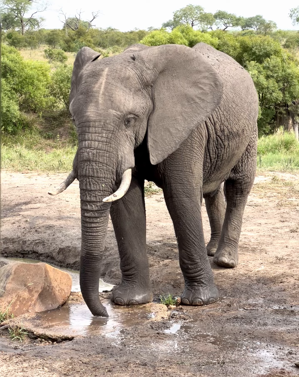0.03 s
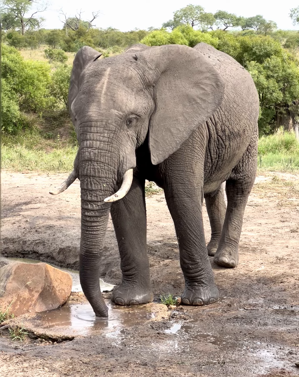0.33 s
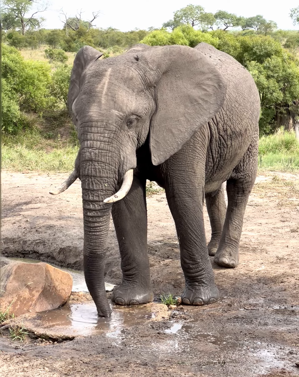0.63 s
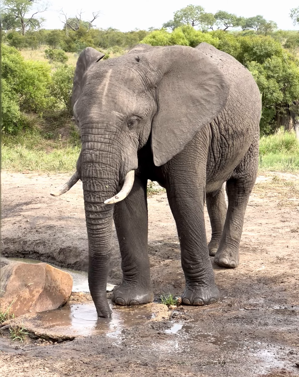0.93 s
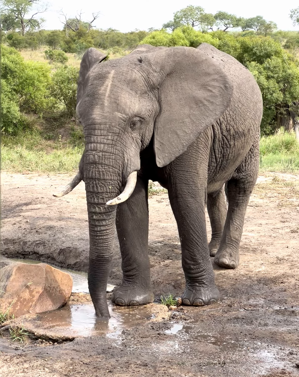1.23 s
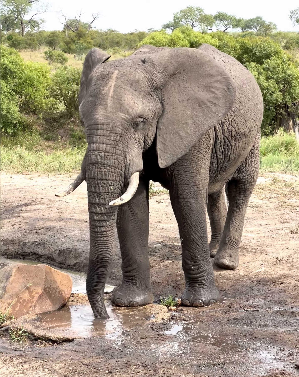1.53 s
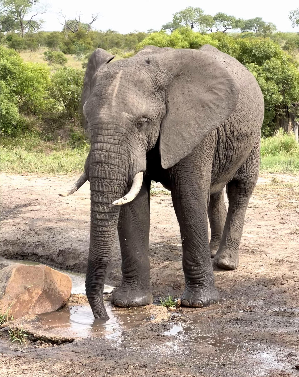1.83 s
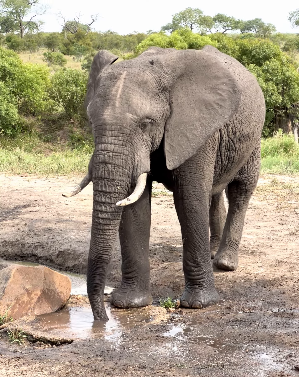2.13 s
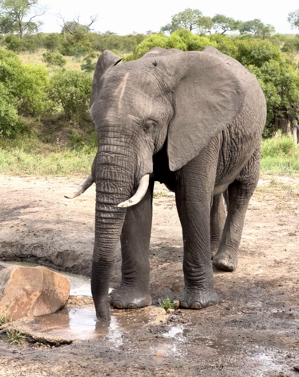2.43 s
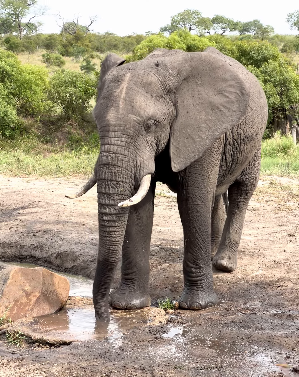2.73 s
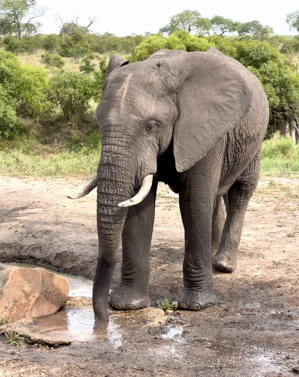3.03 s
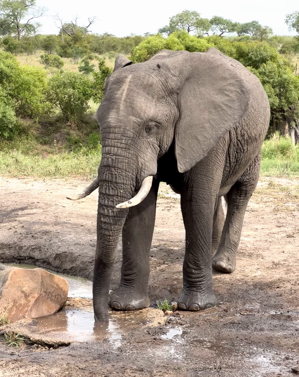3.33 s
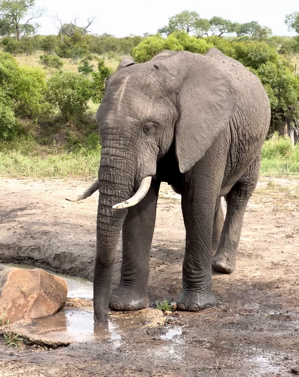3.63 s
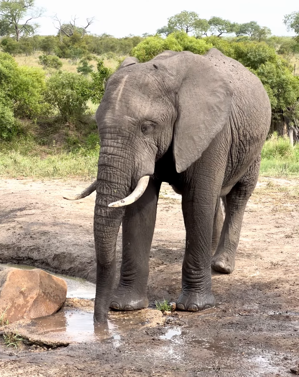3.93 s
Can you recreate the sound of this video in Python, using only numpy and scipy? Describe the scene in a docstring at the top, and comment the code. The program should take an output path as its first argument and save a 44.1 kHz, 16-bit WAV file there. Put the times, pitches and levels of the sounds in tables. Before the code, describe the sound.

An elephant blows air and water out of its trunk, sputtering with small bubbly pops from about 0.6 to 1.3 seconds. Wind bumps the microphone throughout, with heavy low thuds near 1.7 seconds. A short spitting puff comes at 2.4 seconds, then a long hissing blow runs from 2.7 seconds until the end at 4. Insects, distant birds and rustling bushes stay very faint behind.

```python
"""An elephant blows air and water out of its trunk at a muddy waterhole: a short wet blow,
a few spits and a puff, then a long hiss. The rushing air is noise, coloured by the trunk's
resonances (the pitches it rings at); the spits are bursting bubbles. Wind hits the
microphone in low thuds, while insects and far birds sound faintly in the rustling bush."""
import sys
import numpy as np
from scipy import signal
from scipy.fft import rfft, irfft
from scipy.io import wavfile
from scipy.ndimage import uniform_filter1d, map_coordinates

SR = 44100
rng = np.random.default_rng(int(sys.argv[2]) if len(sys.argv) > 2 else 0)


def pcm_store(signal):
    """Save signal as 16-bit PCM."""
    levels = np.round(np.clip(np.atleast_2d(signal), -1, 1) * 32767)
    wavfile.write(sys.argv[1], SR, levels.astype(np.int16).T)


N = 176400
T, HZ = np.arange(N) / SR, np.fft.rfftfreq(N, 1 / SR)

# tone colour of each background noise (frequency [Hz], relative level [dB])
BUSH_COLOUR = [(100, 6), (500, -1), (800, 0), (1050, 0.5), (1500, 0), (2100, -6.5), (3000, -4),
               (4000, -8.5), (5300, -15), (7000, -10.5), (9000, -8), (10000, -19.5), (11000, -22),
               (12000, -15), (15000, -23)]
BREEZE_COLOUR = [(20, -50), (35, -11), (55, 6), (90, 5.5), (150, -7), (250, -13.5), (450, -31.5),
                 (900, -63)]
# bands of insect song (pitch [Hz], rough width [Hz], level [dB])
INSECT_BANDS = [(7230, 600, -84.5), (7820, 260, -83.5), (8220, 260, -80)]
# how the song swells (time [s], level change [dB])
INSECT_LOUDNESS = [(0, -2.5), (.4, 0), (1.45, -3), (1.85, 0.5), (2.4, -2.5)]
# far bird notes (middle [s], half length [s], pitch [Hz], level [dB])
FAR_NOTES = [(0.007, 0.063, 1365, -67.5), (0.333, 0.038, 1040, -71.5), (1.59, 0.032, 1030, -67),
             (2.054, 0.017, 3700, -80), (2.158, 0.01, 3940, -75), (1.721, 0.023, 4000, -74.5),
             (1.834, 0.011, 3600, -76.5), (2.277, 0.023, 4340, -71)]
# the breeze arriving at the microphone (time [s], level [dB])
BREEZE_LOUDNESS = [(0, -55), (.3, -67), (.55, -55), (.85, -47.5), (1.1, -44.5), (1.5, -56), (1.65, -53),
                   (1.9, -44.5), (2.22, -48), (2.4, -43.5), (2.57, -47), (2.68, -65), (2.78, -50),
                   (3.02, -60.5), (3.42, -40), (3.65, -57), (4, -64)]
# gusts arriving there (middle [s], length [s], level [dB], upper edge [Hz])
GUSTS = [(0.073, 0.026, -50, 76), (0.187, 0.033, -49, 98), (0.478, 0.02, -47.5, 139),
         (0.589, 0.018, -28, 179), (0.742, 0.027, -32, 160), (1.017, 0.013, -32, 187),
         (1.061, 0.015, -37.5, 157), (1.097, 0.013, -33, 183), (1.139, 0.032, -37.5, 201),
         (1.286, 0.026, -31.5, 145), (1.404, 0.0081, -39.5, 183), (1.566, 0.015, -44.5, 86.4),
         (1.715, 0.02, -29, 273), (1.746, 0.025, -31.5, 101), (1.7795, 0.0022, -28.5, 714),
         (1.824, 0.03, -39, 95), (1.876, 0.045, -42, 170), (2.055, 0.022, -30, 172),
         (2.093, 0.012, -31.5, 188), (2.151, 0.031, -38.5, 207), (2.289, 0.022, -31, 171),
         (2.341, 0.022, -35, 101), (2.531, 0.021, -34.5, 225), (2.929, 0.0083, -38.5, 179),
         (2.96, 0.023, -42, 110), (3.111, 0.059, -41, 177), (3.21, 0.041, -42.5, 206),
         (3.326, 0.038, -36.5, 147), (3.412, 0.016, -30, 225), (3.487, 0.016, -37, 148)]
# how the microphone colours both (frequency [Hz], level change [dB])
MIC_COLOUR = [(30, -4.5), (60, 1.5), (85, 2), (115, 2), (160, -2), (235, -1.5), (340, -2), (470, 3),
              (650, -3.5), (1200, -12)]
# heavy thuds (start [s], swell time [s], first pitch [Hz], last pitch [Hz], level [dB])
WIND_THUDS = [(1.699, 0.0048, 298, 199, -18), (1.7092, 0.011, 536, 102, -18), (1.7765, 0.013, 943, 79, -17)]
# fine high sprays (middle [s], half length [s], level [dB])
MIST_BURSTS = [(0.999, 0.012, -49.5), (1.158, .005, -51.5), (1.656, 0.034, -74)]
# bubbles at the trunk tip (time [s], pitch [Hz], pop level [dB], spray level [dB])
BUBBLES = [(0.6385, 1240, -31, -41.5), (0.7234, 1240, -32.5, -45), (0.762, 1280, -29, -37),
           (.765, 2050, -35, -40), (0.8095, 2990, -41, -37.5), (0.826, 1910, -33, -39.5),
           (0.866, 1247, -33, -39), (0.9, 1350, -39, -50), (0.9214, 1094, -37, -59),
           (0.964, 1550, -52, -45), (1.15, 2000, -50, -45), (1.212, 2210, -50, -49),
           (1.3687, 1620, -55, -55.5), (2.316, 1055, -47, -52.5), (2.323, 2290, -54, -54),
           (2.329, 1575, -46, -51), (2.344, 4660, -66, -51.5), (2.3744, 2600, -55, -50.5),
           (2.381, 1580, -42, -45.5), (2.401, 530, -36, -50.5), (2.437, 1580, -47, -47),
           (2.445, 1130, -35.5, -40), (2.501, 5400, -47, -54), (2.533, 1250, -57, -45),
           (2.619, 3960, -43, -52)]
# tone colour of each spray and air jet (frequency [Hz], relative level [dB])
MIST_COLOUR = [(1000, -15), (6000, 1), (10000, -12.5), (11800, 0), (15500, -8)]
SPRAY_COLOUR = [(300, -13), (1200, 5), (2000, 2), (4500, -4), (6500, -10), (10000, -21.5), (16000, -20)]
WET_COLOUR = [(260, -4), (450, -9), (600, -9), (790, -12.5), (1000, -6), (1250, -7), (1430, -7), (1980, -8),
              (2660, -21), (3000, -17.5), (4270, -16), (4880, -21.5), (6570, -23.5), (8570, -30),
              (10500, -30), (11700, -20.5), (15500, -29.5)]
PUFF_COLOUR = [(260, 2.5), (450, 0), (790, -8.5), (1210, -0.5), (1520, -4), (1680, -4), (2430, -2),
               (2620, -14), (3180, -6), (6660, -11), (9790, -24), (11700, -13), (15500, -20)]
NARROW_COLOUR = [(260, -2), (450, -4), (642, -7), (802, -19.5), (916, -4.5), (1200, -1), (1450, -9),
                 (1580, -1), (1860, -4.5), (2040, 0), (2620, -9), (4150, -2), (6500, -7), (8000, -13.5),
                 (10300, -15.5), (12000, -5.5), (15500, -14.5)]
OPEN_COLOUR = [(88, -41), (150, -3.5), (189, -7), (248, -13), (352, -5), (420, -10.5), (656, -11),
               (796, -17.5), (1150, -2.5), (1420, -11), (1570, -9), (2230, -12.5), (4000, -8.5),
               (6500, -12.5), (9000, -16), (10400, -16), (11800, -6), (15500, -17.5)]
# resonances for each shape of the trunk (pitch [Hz], width [Hz], relative strength [dB])
WET_RESONANCES = [(1013, 60, -14), (1240, 88, -10), (1733, 19, -6), (1990, 31, -7.5), (2200, 35, -3.5),
                  (2386, 36, 1), (3020, 60, -15), (3800, 160, -16), (4150, 90, -5), (4450, 130, -14),
                  (5320, 150, -18)]
PUFF_RESONANCES = [(1235, 310, -9), (1670, 120, 5), (2080, 100, -3), (3090, 200, -3), (4320, 170, 0.5),
                   (5400, 220, 0)]
NARROW_RESONANCES = [(1250, 200, 2.5), (1598, 43, 2.5), (1763, 21, 4.5), (2036, 37, -2.5), (2400, 70, -6),
                     (3110, 83, -4), (3390, 49, -7), (3680, 69, -8), (4025, 41, -2), (4250, 64, -1),
                     (4610, 32, -3), (5340, 340, -9)]
OPEN_RESONANCES = [(1060, 400, -9), (1588, 33, -4.5), (1780, 23, -11), (1985, 25, -5.5), (3260, 42, -6),
                   (3403, 55, -5), (3680, 68, -11), (4196, 110, 0), (4630, 70, -10), (5000, 64, -21),
                   (5620, 160, -9), (6500, 380, -14)]
# strength of the crowded upper resonances (frequency [Hz], share [0-1])
RIPPLE_STRENGTH = [(500, 0.16), (5500, 0.55), (11000, 0.28)]
# air flow of each blow, before blow() adds its boosts
# (time [s], hiss level [dB], lows relative to hiss [dB], top treble relative to hiss [dB])
WET_FLOW = [(0.5, -101, 5, 17), (0.52, -76.5, 2.5, -6), (0.608, -49, 2.5, -7), (0.822, -48, 3, -5),
            (0.894, -53, 7, -6), (1.18, -57, 5, -10.5), (1.212, -53, 5.5, -7), (1.252, -64, 11, -11),
            (1.267, -56.5, -1, -1), (1.284, -76, 7, -6), (1.29, -63, 1, -20), (1.36, -90, 18, 0)]
PUFF_FLOW = [(2.41, -79, 8, -20), (2.43, -69, 12, -5), (2.442, -55, 6, -12), (2.512, -57, 3.5, -1),
             (2.532, -67, 9, 2), (2.536, -48, 0, -6), (2.565, -46, -2, -4), (2.634, -53, -2.5, -7.5),
             (2.678, -62, 0, 2), (2.71, -79, 11, -7)]
LONG_FLOW = [(2.71, -61, 2, -12), (2.724, -62, 1, 5.5), (2.77, -52.5, 3, -3.5), (2.81, -55.5, 1.5, -0.5),
             (3.108, -42, -2, -8), (3.194, -46, -0.5, -8), (3.276, -43.5, -4, -8), (3.338, -47, -0.5, -6.5),
             (3.654, -45, 2.5, -5), (3.942, -43, 2.5, -5.5), (4.0, -44.5, 5, -5)]


def amp(db):
    """Turns decibels into a gain to multiply by."""
    return 10 ** (np.asarray(db) / 20)


def unit(x):
    """Scales x to an average strength (rms) of 1."""
    return x / np.sqrt(np.mean(x ** 2) + 1e-20)


def colour(points):
    """A gain for every frequency, from (frequency [Hz], level [dB]) points."""
    hz, db = np.transpose(points)
    return amp(np.interp(np.log(HZ + 1), np.log(hz), db))


def shaped(x, gain):
    """Filters x by a gain at every frequency."""
    return irfft(rfft(x) * gain)


def noise(gain):
    """Coloured noise of strength 1."""
    return unit(shaped(rng.standard_normal(N), gain))


def wander(hz):
    """A smooth random wobble, up to about hz changes a second."""
    return noise(np.exp(-(HZ / hz) ** 2))


def patchy(x, depth_db, span_hz, span_s):
    """Makes random patches of pitch and time louder or softer."""
    frames = dict(nperseg=512, noverlap=384)
    grid = signal.stft(x, **frames)[2]
    across = np.fft.fftfreq(grid.shape[0], SR / 512)[:, None]
    along = np.fft.fftfreq(grid.shape[1], 128 / SR)
    blur = np.exp(-(across * span_hz) ** 2 - (along * span_s) ** 2)
    patches = np.fft.ifft2(np.fft.fft2(rng.standard_normal(grid.shape)) * blur).real
    return signal.istft(grid * amp(depth_db * unit(patches)), **frames)[1][:N]


def bush(level_db=-71):
    """The bush rustles: a soft hush whose colour keeps shifting."""
    return amp(level_db) * unit(patchy(noise(colour(BUSH_COLOUR)), 2.0, span_hz=1190, span_s=0.067))


def insects(shimmer_db=1.5):
    """Insects shrill in narrow, shimmering bands of high noise."""
    song = sum(amp(db) * noise(1 / (1 + ((HZ - hz) / width * 1.8) ** 2))
               for hz, width, db in INSECT_BANDS)
    return song * amp(np.interp(T, *np.transpose(INSECT_LOUDNESS)) + shimmer_db * wander(60))


def far_birds(blur=0.12, chatter_start_s=0.9, beats_per_s=21, chatter_db=-76.5):
    """Single notes blurred by distance, and a low bird that starts chattering."""
    def band(hz, width_hz):
        return noise(np.exp(-((HZ - hz) / width_hz) ** 2))
    notes = sum(amp(db) * np.exp(-((T - s) / half) ** 2) * band(hz, blur * hz)
                for s, half, hz, db in FAR_NOTES)
    beats = np.sin(np.pi * (beats_per_s * T + 0.075 * wander(5.6))) ** 2
    chatter = unit(beats * band(hz=980, width_hz=110))
    return notes + amp(chatter_db) * (T > chatter_start_s) * chatter


def wind(low_hz=61.4):
    """A low breeze with short gusts that thump the microphone; each gust reaches up to its own upper edge."""
    out = noise(colour(BREEZE_COLOUR)) * amp(np.interp(T, *np.transpose(BREEZE_LOUDNESS)))
    t, hz = np.arange(-8192, 8192) / SR, np.fft.rfftfreq(16384, 1 / SR) + 1
    for s, length, db, edge_hz in GUSTS:
        band = 1 / np.sqrt((1 + (hz / edge_hz) ** 5.88) * (1 + (low_hz / hz) ** 4.2))
        trim = 1 / np.sqrt((1 + (45 / hz) ** 10) * (1 + (hz / edge_hz / 2.4) ** 10))
        swell = 1 / np.cosh(2 * t / length)
        swirl = shaped(rng.standard_normal(len(t)), band)
        gust = unit(shaped(swirl * swell, trim)) * np.sqrt(np.mean(swell ** 2))
        out += np.interp(T, s + t, amp(db) * gust, 0, 0)
    return shaped(out, colour(MIC_COLOUR))


def thuds(wobble=0.11, fall_s=0.00452):
    """Each heavy thud of wind swells quickly while its pitch drops from a knock to a low boom."""
    out = np.zeros(N)
    for s, swell_s, first_hz, last_hz, db in WIND_THUDS:
        t = np.maximum(T - s, 0)
        hz = last_hz + (first_hz - last_hz) * np.exp(-t / fall_s)
        hz *= 1 + wobble * wander(290)
        swell = (t / swell_s * np.exp((1 - (t / swell_s) ** 2) / 2)) ** 1.12
        out += amp(db) * swell * np.sin(2 * np.pi * np.cumsum(hz * (t > 0)) / SR)
    return shaped(out, 1 / (1 + (45 / (HZ + 1)) ** 4))


def mists():
    """Thin jets of spray escape around the trunk tip."""
    bursts = sum(amp(db) * np.exp(-((T - s) / half) ** 2) for s, half, db in MIST_BURSTS)
    return noise(colour(MIST_COLOUR)) * bursts


def spits(pop_rise_s=0.0012, pop_fade_s=0.0058, glide_per_s=2.1,
          spray_rise_s=0.0034, spray_fade_s=0.012):
    """Each bursting bubble rings briefly, rising in pitch, and throws a little spray."""
    out, t = np.zeros(N), np.arange(3000) / SR
    for s, hz, pop_db, spray_db in BUBBLES:
        at = slice(round(s * SR), round(s * SR) + len(t))
        pop = np.sin(2 * np.pi * hz * (t + glide_per_s * t ** 2 / 2))
        pop *= np.minimum(t / pop_rise_s, 1) * np.exp(-t / pop_fade_s)
        # the bubble's hollow lifts the spray around its pitch
        hollow = amp(12.5 / (1 + ((HZ - hz) / 262) ** 2))
        spray = noise(colour(SPRAY_COLOUR) * hollow)[at]
        spray *= np.minimum(t / spray_rise_s, 1) ** 1.1 * np.exp(-t / spray_fade_s)
        out[at] += amp(pop_db) * pop + amp(spray_db) * spray
    return out


def flexing(air, bend=0.007, bend_hz=2.6):
    """The moving trunk bends its resonances a little, and water in the jet shifts its colour."""
    bent = map_coordinates(air, [np.cumsum(1 + bend * wander(bend_hz))], order=5, mode="wrap")
    return patchy(bent, depth_db=1.35, span_hz=1130, span_s=0.054)


def drifting(air):
    """The crowded upper resonances come and go as the nostrils change shape."""
    upper = shaped(air, 1 / (1 + (2000 / (HZ + 1)) ** 4))
    return air - upper + unit(patchy(upper, depth_db=2.5, span_hz=130, span_s=0.24)) * np.std(upper)


def trunk_tube(resonances, ring, ripple_db, ripple_hz=95):
    """The trunk's gain at each frequency: main peaks, plus random ripples for the crowded upper ones."""
    power = sum(amp(db) ** 2 / (1 + (2 * (HZ - hz) / width) ** 2) for hz, width, db in resonances)
    peaks = (power / uniform_filter1d(power, size=2400)) ** (ring / 2)
    bump = np.exp(-(np.arange(-400, 401) * HZ[1] / ripple_hz * 2) ** 2)
    ripples = unit(signal.oaconvolve(rng.standard_normal(len(HZ)), bump, "same"))
    return peaks * amp(ripple_db * ripples * np.interp(HZ, *np.transpose(RIPPLE_STRENGTH)))


def jet(spectrum, resonances, ring, ripple_db, drops_db, flutter_db, drops_per_s=900, low_hz=170):
    """Fluttering air and ticking water drops, coloured by the trunk."""
    tube = trunk_tube(resonances, ring, ripple_db)
    sizes = rng.standard_normal(N) * amp(4 * np.minimum(rng.exponential(1, N), 4))
    drops = sizes * (rng.random(N) < drops_per_s / SR)
    rush = rng.standard_normal(N) + amp(drops_db) * unit(drops)
    flutter = amp(flutter_db * wander(70))
    bass_cut = 1 / np.sqrt(1 + (low_hz / (HZ + 1)) ** 6)
    return flexing(shaped(rush * flutter, colour(spectrum) * tube * bass_cut))


def blow(air, flow, low_db, hiss_db, top_db):
    """The lows, hiss and top treble of a jet follow the air flow, each with its own boost or cut."""
    s, level, low, top = np.transpose(flow)
    below = 1 / (1 + (HZ / 2430) ** 10)
    above = 1 - 1 / (1 + (HZ / 7400) ** 10)
    bands = [(below, level + low + low_db), (1 - below - above, level + hiss_db),
             (above, level + top + top_db)]
    fade = np.clip(np.minimum(T - s[0], s[-1] - T) / 0.013 + 1, 0, 1)
    return fade * sum(unit(shaped(air, band)) * amp(np.interp(T, s, db)) for band, db in bands)


def trunk_air(half_open_s=3.335, opening_s=0.75):
    """The elephant gives a sputtering blow, a puff, and a long blow during which its nostrils open."""
    wet = jet(WET_COLOUR, WET_RESONANCES, ring=0.71, ripple_db=2, drops_db=-6, flutter_db=1.6)
    puff = jet(PUFF_COLOUR, PUFF_RESONANCES, ring=0.77, ripple_db=5.5, drops_db=-3.5, flutter_db=1.5)
    narrow = jet(NARROW_COLOUR, NARROW_RESONANCES, ring=0.86, ripple_db=4.5, drops_db=-6, flutter_db=0.5)
    wide = jet(OPEN_COLOUR, OPEN_RESONANCES, ring=0.87, ripple_db=2, drops_db=-10.5, flutter_db=0.65)
    blend = np.pi / 2 * np.clip((T - half_open_s) / opening_s + 0.5, 0, 1)
    steady = drifting(np.cos(blend) * unit(narrow) + np.sin(blend) * unit(wide))
    return (blow(wet, WET_FLOW, low_db=0, hiss_db=0, top_db=1.8)
            + blow(puff, PUFF_FLOW, low_db=-0.5, hiss_db=-1.2, top_db=1.7)
            + blow(steady, LONG_FLOW, low_db=-0.5, hiss_db=0.44, top_db=2))


def scene():
    """Trunk, wind and bush, added into one channel."""
    return (trunk_air() + spits() + mists() + wind() + thuds() + insects() + bush() + far_birds())[None]


def record(dry, edge_hz=15820):
    """Cuts away the very highest treble."""
    treble_cut = signal.firwin(1023, edge_hz, window=("kaiser", 9), fs=SR)
    return signal.oaconvolve(dry, treble_cut[None], "same")


dry = scene()
out = record(dry)
pcm_store(out)
```